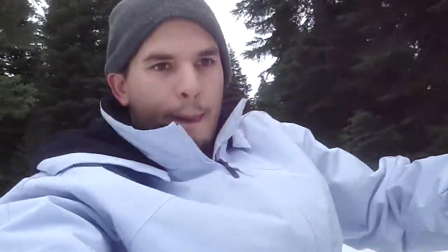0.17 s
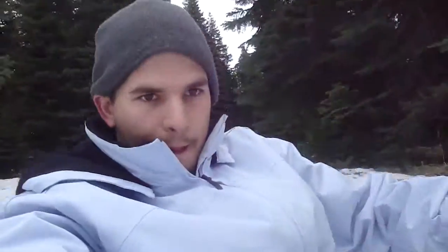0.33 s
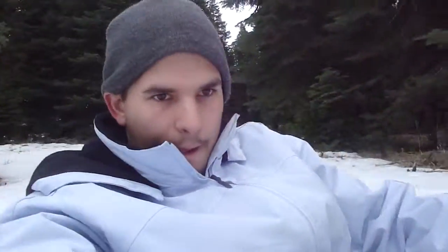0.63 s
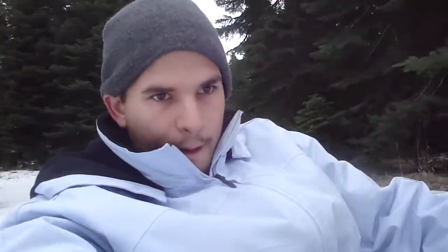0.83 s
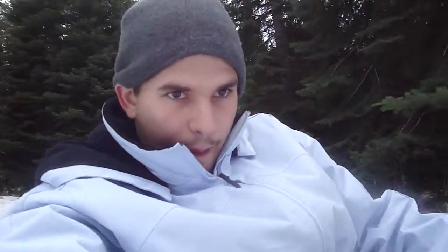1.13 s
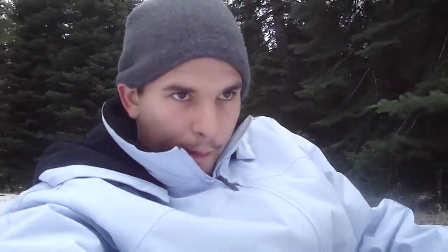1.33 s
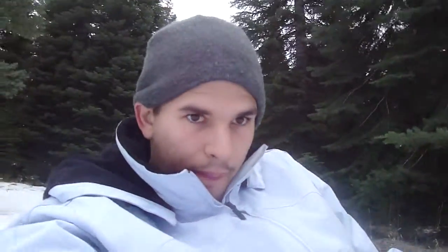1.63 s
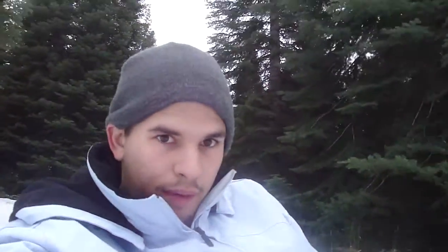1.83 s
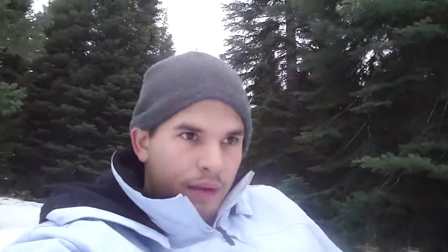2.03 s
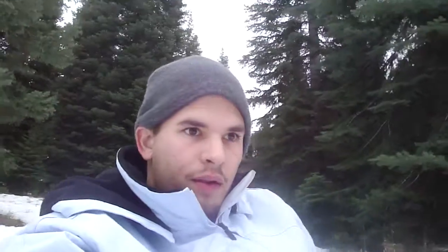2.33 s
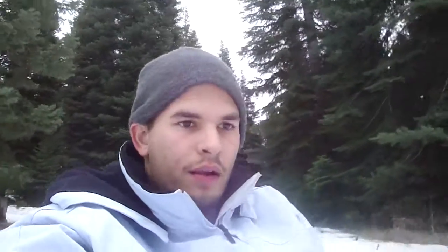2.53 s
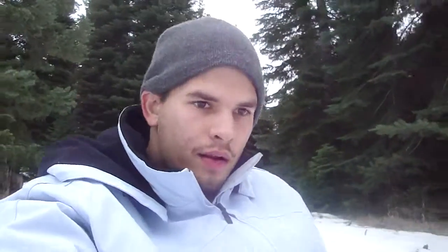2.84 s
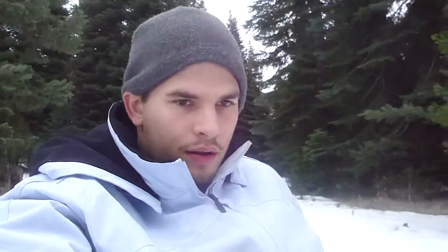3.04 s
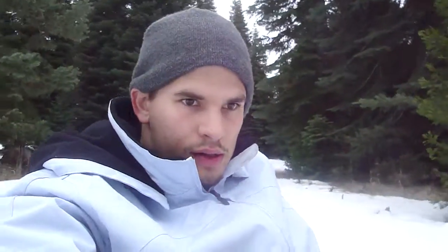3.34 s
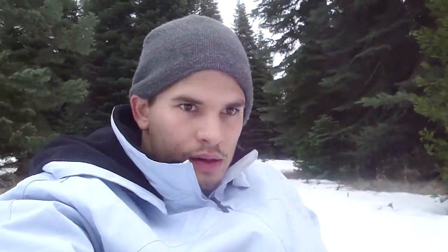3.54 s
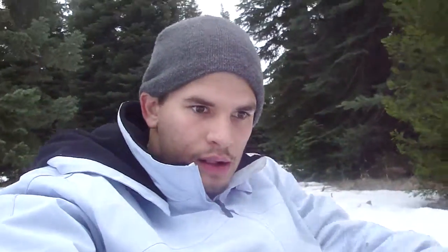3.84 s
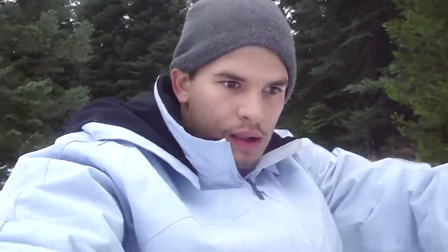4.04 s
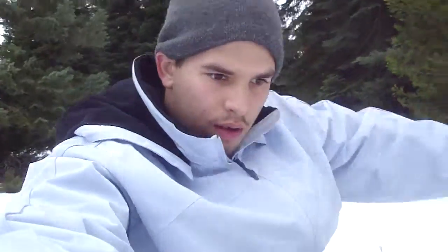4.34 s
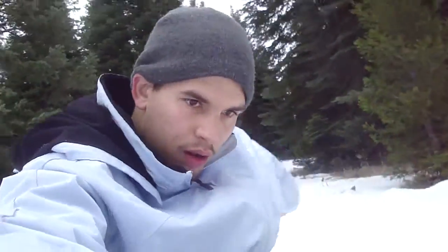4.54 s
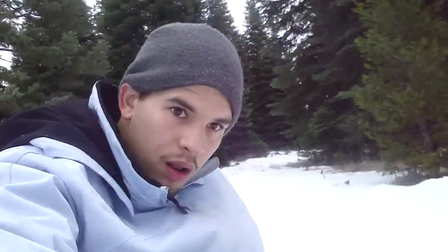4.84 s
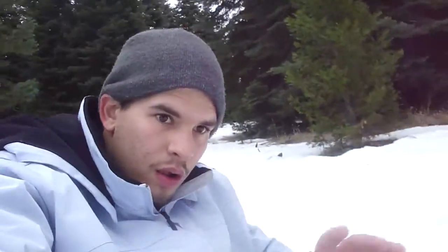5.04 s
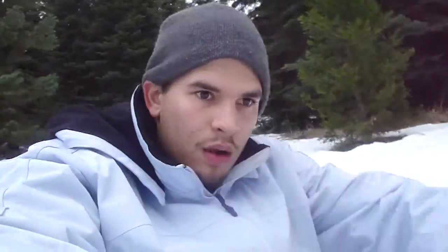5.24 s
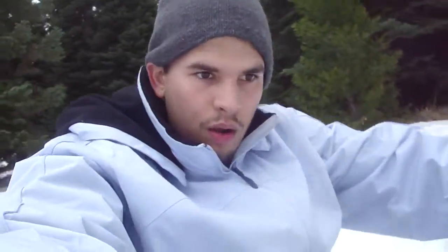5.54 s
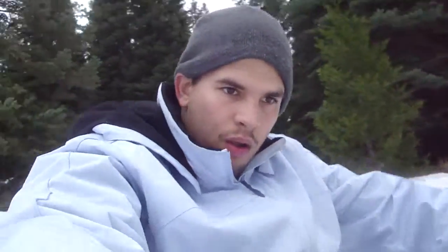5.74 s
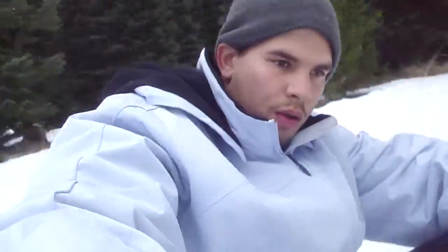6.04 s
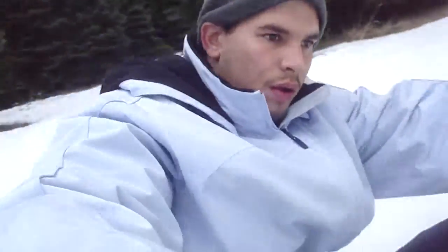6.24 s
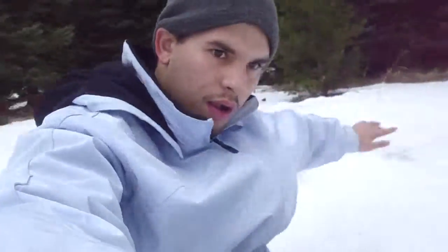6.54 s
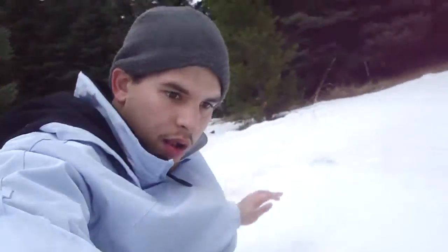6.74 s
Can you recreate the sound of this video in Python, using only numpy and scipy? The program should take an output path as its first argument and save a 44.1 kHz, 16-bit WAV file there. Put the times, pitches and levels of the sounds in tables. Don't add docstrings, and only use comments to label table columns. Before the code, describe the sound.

A sled is already running down a snowy slope at 0 seconds and keeps sliding to the end, near 6.9. The close, dry sound is a dense grainy rush: hollow hull drumming, midrange runner scrape, icy rasp and bright hissing loose snow. A wind thump opens it, followed by fluttering puffs at 0.4-0.6 and harder thuds at 0.7-0.95, momentarily dipping the ride. After a lull, more puffs hit at 1.55-1.95 and around 2.5. From 2.6 to 3.5 the scrape is steadier and icier, with fuller snow spray. Quick jolts make it uneven at 3.75-4.45, then spray swells near 4.5. Wind is sparser, with bumps near 5.65. Around 6.15-6.25 a stronger puff and jolt land; at 6.4 a bright burst of snow flares over a lighter scrape. The nearly mono small-microphone sound has thin bass and softened treble, and ends mid-slide.

```python
import sys
import numpy as np
from scipy import signal
from scipy.io import wavfile

SR = 44100
rng = np.random.default_rng(int(sys.argv[2]) if len(sys.argv) > 2 else 0)


def materialize(psi):
    bounded = np.clip(np.atleast_2d(psi).T, -1, 1)
    quanta = np.round(bounded * 32767).astype(np.int16)
    wavfile.write(sys.argv[1], SR, quanta)


def how_loud(loudness_db):
    steps = np.asarray(loudness_db, float) / 20
    return 10 ** steps


N = 303170


def rms_one(x):
    return x / np.sqrt(np.mean(x ** 2) + 1e-20)


def butter(x, hz, kind, order=2):
    return signal.sosfilt(signal.butter(order, hz, kind, fs=SR, output="sos"), x)


def steep(x, hz, kind):
    return signal.sosfilt(signal.ellip(14, .3, 70, hz, kind, fs=SR, output="sos"), x)


def in_time(rows):
    s, *columns = np.transpose(rows)
    return [np.interp(np.arange(N) / SR, s, c) for c in columns]


def drift(rate_hz):
    r = np.exp(-80 * np.pi * rate_hz / SR)
    noise = rng.standard_normal(N // 40 + 2002)
    slow = signal.lfilter([1], [1, -2 * r, r * r], noise)[2000:]
    return np.interp(np.arange(N) / 40, np.arange(len(slow)), rms_one(slow - slow.mean()))


def grains(per_s, spread_db):
    size_db = spread_db * np.minimum(rng.exponential(1, (2, N)), 4)
    clicks = how_loud(size_db) * rng.choice([-1, 1], (2, N))
    return clicks * (rng.random((2, N)) < per_s / SR)


def colour(streams, spectrum, shared_db, patchy_db):
    hz, db = np.transpose(spectrum)
    edges = hz[0] * 2 ** np.arange(0, np.log2(hz[-1] / hz[0]), 1 / 4)
    out = 0
    for k, (low, high) in enumerate(zip(edges, edges[1:])):
        level_db = np.interp(np.log(low * high) / 2, np.log(hz), db)
        gain = how_loud(level_db + shared_db + patchy_db * drift(8.3))
        out = out + gain * butter(streams[k % 2], [low, high], "band")
    return rms_one(out)


# t/s, load on snow/dB, track iciness/dB, shell flex/dB
RIDE = [(0, -20.5, -2, -2), (.18, -22.5, 2.5, -0.5), (.55, -23.5, -1, 3), (.92, -25.5, -1, -6),
        (1.35, -22, -0.5, -2), (2, -22.5, 1, -5), (2.25, -20.5, -0.5, -0.5), (2.6, -22.5, 2.5, 2.5),
        (3.3, -22.5, 1.5, 1), (3.55, -24.5, 0, 3.5), (3.85, -25, -3, 3), (4.15, -22.5, -0.5, 1),
        (4.6, -23, 2, 4.5), (5, -24, -1, 1), (5.7, -23.5, -0.5, -0.5), (6.15, -24, -.5, -3.5),
        (6.45, -28, 2, 0), (6.7, -23.5, -1, 2.5)]
# t/s, extra load/dB
JOLTS = [(.125, 2.5), (.19, 1.5), (.4, 1.5), (.61, 4), (1.15, 3), (2.1, 1), (2.64, 3.5), (3.752, 4),
         (3.85, -2.5), (3.94, 2), (4.103, 5), (4.15, 1.5), (4.18, -7.5), (4.245, 4), (4.275, 1.5),
         (4.32, -3), (4.35, -0.5), (4.415, 3), (4.75, 3), (4.86, 3.5), (5.05, 1.5), (5.46, -2.5), (5.64, 4),
         (5.7, 1.5), (6.11, 1.5), (6.15, 2), (6.248, 4.5), (6.39, 3.5), (6.66, 3.5)]


def load():
    half_width_s, unload_s, unload_share = 0.01, 0.021, 0.36
    t, jolt_db = np.arange(0, N, 40) / SR, 0
    for s, db in JOLTS:
        press = np.exp(-((t - s) / half_width_s) ** 2)
        lighten = np.exp(-((t - s - unload_s) / half_width_s) ** 2)
        jolt_db = jolt_db + db * (press - unload_share * lighten)
    return *in_time(RIDE), np.interp(np.arange(N) / SR, t, jolt_db)


# f/Hz, level per Hz/dB
DRUM_SPECTRUM = [(90, -32), (150, -10.5), (220, -1), (420, 1.5), (650, -4), (1100, -14), (1600, -26)]


def drum(bumps, ice_db):
    beat = colour(grains(3000, spread_db=2.5), DRUM_SPECTRUM, 0.21 * bumps, patchy_db=1.6)
    return how_loud(-0.67 - 0.36 * ice_db) * beat


# f/Hz, level per Hz/dB
SCRAPE_SPECTRUM = [(350, -24.5), (550, -2), (860, 1), (1200, 0), (1600, -8), (2400, -27)]


def scrape(contact, bumps, ice_db, flex_db):
    rub = colour(contact, SCRAPE_SPECTRUM, 0.23 * bumps, patchy_db=1.0)
    return how_loud(1.16 + 0.15 * ice_db + 0.16 * flex_db) * rub


# f/Hz, level per Hz/dB
RASP_SPECTRUM = [(800, -18.5), (1300, -3), (1650, 3), (2050, -0.5), (2500, -4), (3500, -10.5), (5500, -36)]


def rasp(contact, bumps, ice_db):
    grate = colour(contact[::-1], RASP_SPECTRUM, 0.46 * bumps, patchy_db=1.22)
    return how_loud(-1.83 + 0.99 * ice_db) * grate


# f/Hz, level per Hz/dB
SPRAY_SPECTRUM = [(1600, -12), (2500, -1), (3500, -1.5), (5000, -1), (6500, -7.5), (9000, -13.5),
                  (11500, -33)]


def spray(bumps, flurry, thrown_db):
    surge_db = 0.19 * bumps + 1.15 * flurry
    hiss = colour(grains(22000, spread_db=2.5), SPRAY_SPECTRUM, surge_db, patchy_db=-0.03)
    return how_loud(thrown_db - 0.66) * hiss


# f/Hz, level per Hz/dB
POWDER_SPECTRUM = [(3500, -18), (5500, 3), (7000, 2), (9000, -1), (12500, -9.5)]


def powder(bumps, flurry, thrown_db, fine_db):
    growth, mean_db = 1.84, thrown_db.mean()
    surge_db = 0.099 * bumps + 0.19 * flurry
    hiss = colour(grains(15000, spread_db=1.5), POWDER_SPECTRUM, surge_db, patchy_db=1.03)
    return how_loud(-6 + fine_db + mean_db + growth * (thrown_db - mean_db)) * hiss


# t/s, amount/dB, fineness/dB
THROWN = [(0, -22, -1), (.27, -26.5, 1.5), (.57, -25, -5), (.92, -30, 0.5), (1.4, -28, 1),
          (2.45, -25.5, -2.5), (2.75, -23.5, -1), (3.2, -24, -0.5), (3.5, -27, 1), (3.9, -27, 0.5),
          (4.48, -21.5, 1.5), (4.9, -25.5, -2), (5.45, -26.5, 5), (5.7, -23, 3), (5.92, -26, 4),
          (6.4, -18, -2.5), (6.6, -26, -0.5), (6.87, -24.5, 1.5)]


def sled():
    load_db, ice_db, flex_db, jolt_db = load()
    thrown_db, fine_db = in_time(THROWN)
    thrown_db = thrown_db + 0.23 * jolt_db
    bumps, flurry = drift(29), drift(19)
    contact = grains(9000, spread_db=2.5)
    body = drum(bumps, ice_db) + scrape(contact, bumps, ice_db, flex_db) + rasp(contact, bumps, ice_db)
    snow = spray(bumps, flurry, thrown_db) + powder(bumps, flurry, thrown_db, fine_db)
    return how_loud(load_db + jolt_db) * body + snow


# f/Hz, width/Hz
HULL_MODES = [
    (430, 94),
    (860, 71),
]


def hull():
    load_db, ice_db, flex_db = in_time(RIDE)
    mode_db, per_ice, per_flex = (-9.5, -12), (-3, 0.8), (-0.63, 1.7)
    out = 0
    for k, (hz, width_hz) in enumerate(HULL_MODES):
        r = np.exp(-np.pi * width_hz / SR)
        poles = [1, -2 * r * np.cos(2 * np.pi * hz / SR), r * r]
        rung = signal.lfilter([1, 0, -1], poles, rng.standard_normal(N))
        level_db = load_db + mode_db[k] + per_ice[k] * ice_db + per_flex[k] * flex_db
        out = out + how_loud(level_db + 0.5 * drift(4.1)) * rms_one(rung)
    return out


def eddy(hz):
    phase = (np.pi * hz * np.arange(-400, 400) / SR) ** 2
    return (1 - 2 * phase) * np.exp(-phase)


# t/s, level/dB
FLUTTER = [
    (0, -31),
    (.95, -49),
    (1.75, -34),
    (2.6, -39),
    (3.15, -37),
    (4.2, -41),
    (5.2, -35),
    (6.1, -39),
    (6.87, -40),
]


def flutter(per_s, spread_db):
    lumps = signal.fftconvolve(grains(per_s, spread_db)[0], eddy(hz=133), "same")
    return how_loud(in_time(FLUTTER)[0] - 5.5) * rms_one(lumps)


# t/s, peak/dB
PUFFS = [(0.021, -14), (0.401, -17.5), (0.441, -18), (0.475, -18), (0.508, -18), (0.578, -26), (0.607, -17),
         (0.693, -10.5), (0.734, -21), (0.776, -17), (0.831, -11.5), (0.931, -10.5), (1.56, -15.5),
         (1.674, -14), (1.761, -18), (1.801, -11.5), (1.833, -17), (1.901, -21), (1.949, -19),
         (2.502, -14.5), (2.556, -17.5), (3.559, -23), (3.738, -19), (4.04, -17), (4.153, -20),
         (4.629, -18), (5.339, -18), (5.402, -17), (6.034, -18), (6.148, -13.5)]


def puffs():
    out = np.zeros(N + 800)
    for s, peak_db in PUFFS:
        at = round(s * SR) - 70
        out[at:at + 800] += how_loud(peak_db + 3.0) * eddy(hz=217)
    return out[400:N + 400]


def ducking(thumps):
    duck_from_db, duck_share, recover_db_per_s = -14.5, 0.23, 73
    ramp_db = recover_db_per_s * np.arange(N) / SR
    over_db = np.maximum(20 * np.log10(np.abs(thumps) + 1e-9) - duck_from_db, 0)
    held_db = np.maximum.accumulate(over_db + ramp_db) - ramp_db
    return how_loud(-duck_share * signal.lfilter([.01], [1, -.99], held_db))


# t/s, from f/Hz, to f/Hz
SLIPS = [
    (1.665, 4100, 5200),
    (1.665, 8900, 10300),
    (2.11, 8100, 9700),
    (2.11, 13000, 14500),
    (4.385, 4100, 5700),
    (4.62, 8900, 11000),
    (6.195, 4100, 7000),
    (6.195, 13000, 14500),
    (6.43, 8900, 10400),
    (6.43, 13000, 14500),
]


def slips(x):
    side, size = np.zeros(N), round(.034 * SR)
    for s, low_hz, high_hz in SLIPS:
        at = round(s * SR) - size // 2
        earlier = x[at - 3 * size:at - size]
        band = steep(steep(earlier, low_hz, "high"), high_hz, "low")[size:]
        side[at:at + size] += how_loud(1) * np.hanning(size) * band
    return side


def scene():
    thumps = puffs()
    ride = sled() + hull() + flutter(170, spread_db=1.5)
    return np.tile(ride * ducking(thumps) + thumps, (2, 1))


def band_limit(x):
    return signal.sosfilt(signal.butter(12, 15720, fs=SR, output="sos"), x)


def record(dry):
    camera_rate_hz = 24000
    x = butter(dry[0], 109, "high", order=3)
    x = butter(x, 8660, "low", order=3)
    x = steep(np.tanh(x), 10990, "low")
    mirror = steep(x, 8000, "high") * np.cos(2 * np.pi * camera_rate_hz * np.arange(N) / SR)
    mirror = butter(mirror, 11700, "low", order=5)
    mirror = steep(mirror, 12900, "high")
    x = x + how_loud(10) * mirror
    mix = x + slips(x) * [[1], [-1]]
    return band_limit(mix)


dry = scene()
out = record(dry)
materialize(out)
```